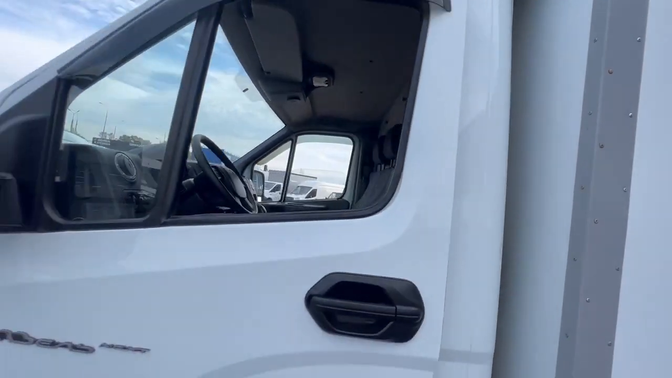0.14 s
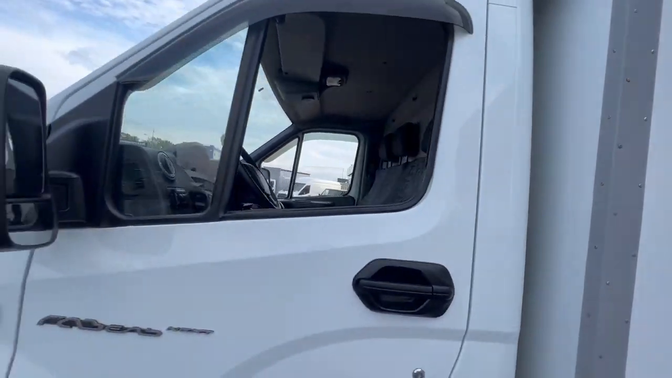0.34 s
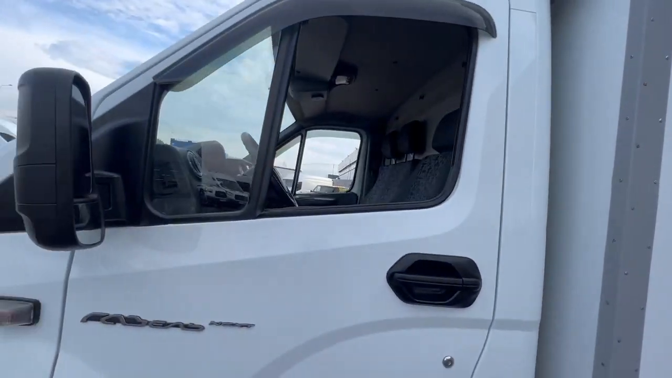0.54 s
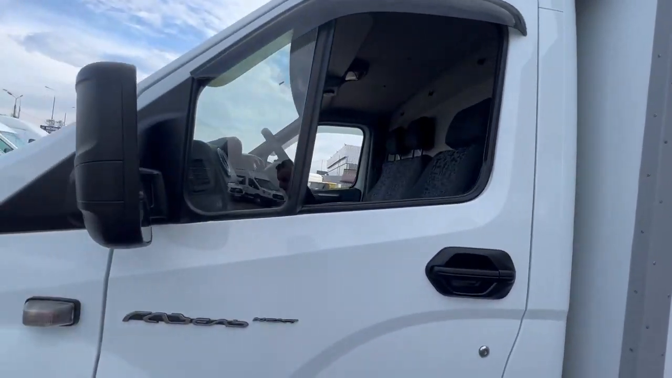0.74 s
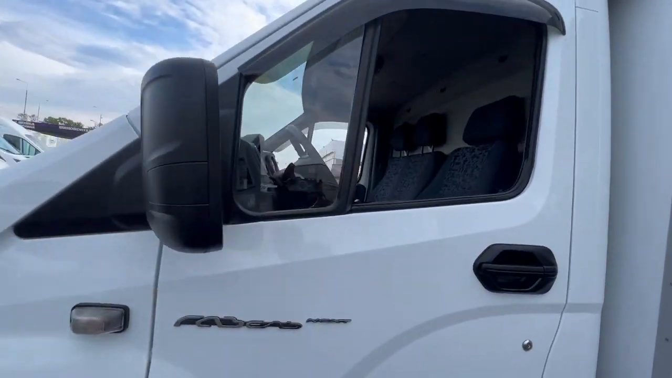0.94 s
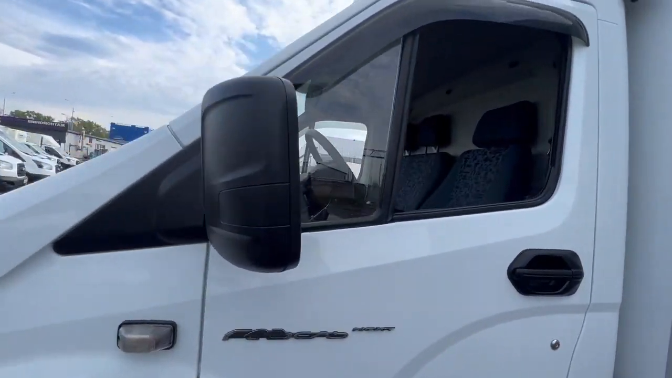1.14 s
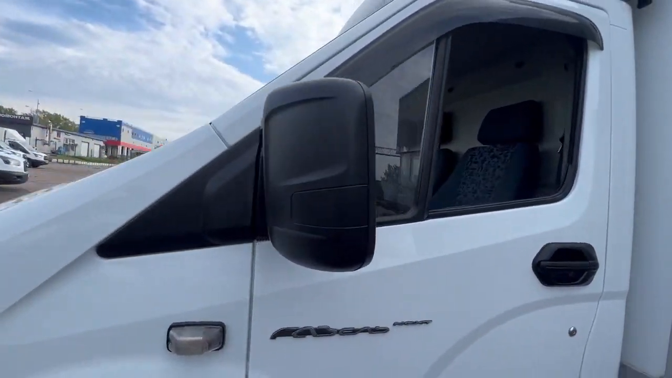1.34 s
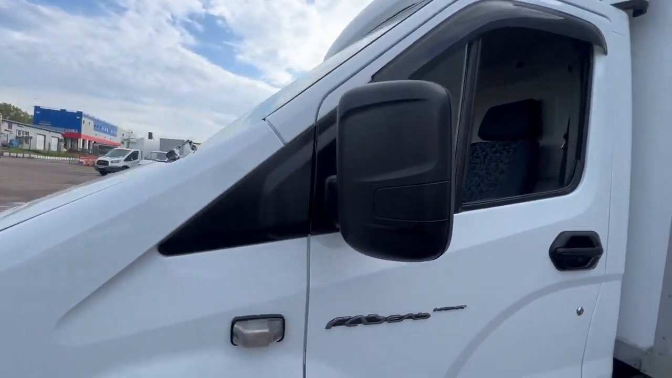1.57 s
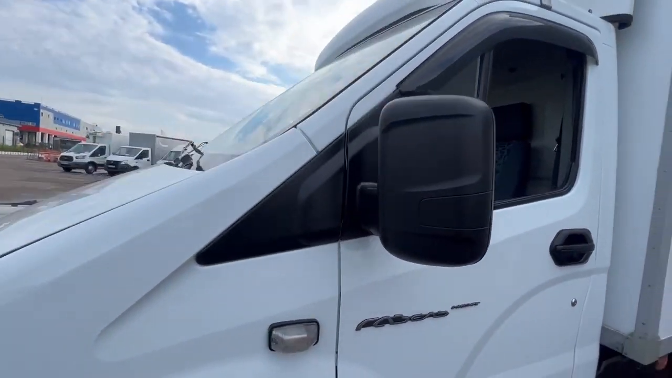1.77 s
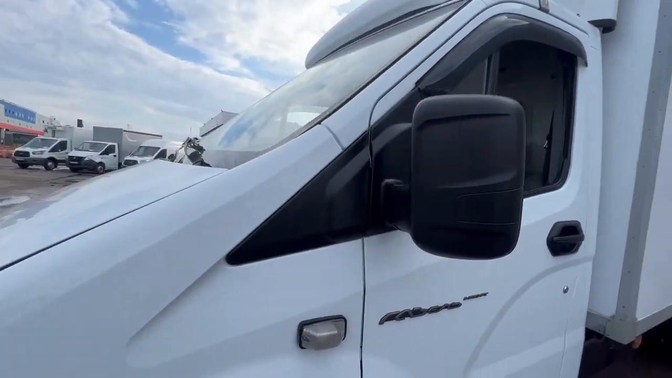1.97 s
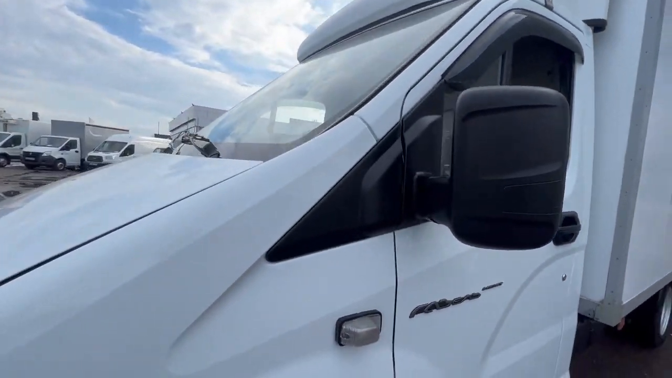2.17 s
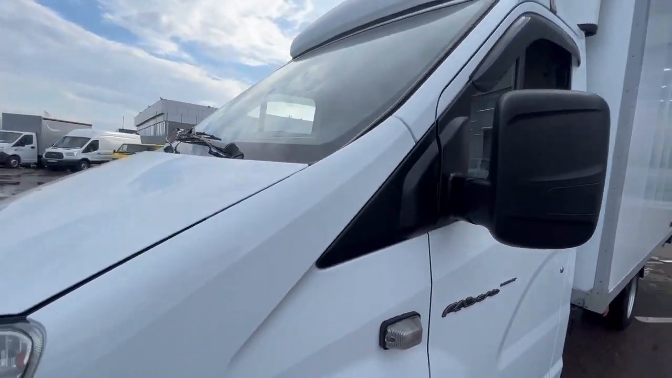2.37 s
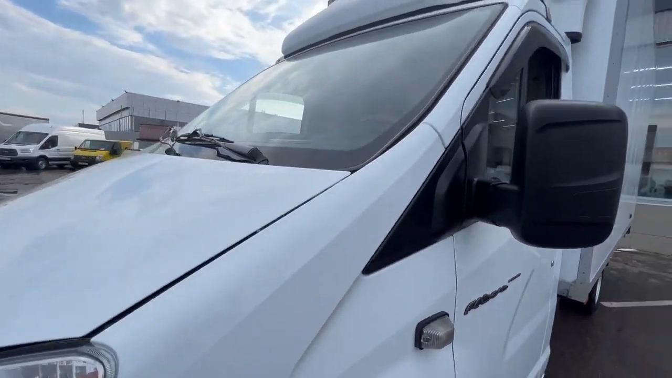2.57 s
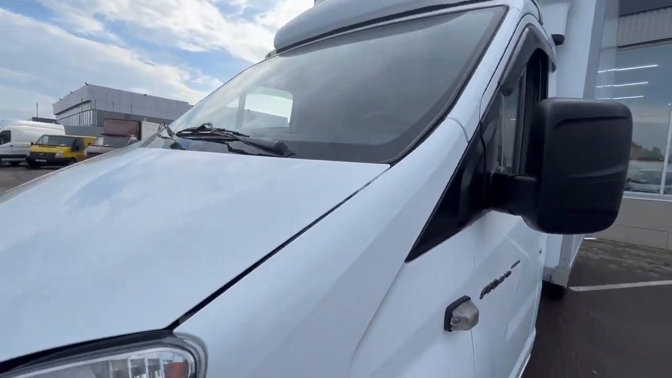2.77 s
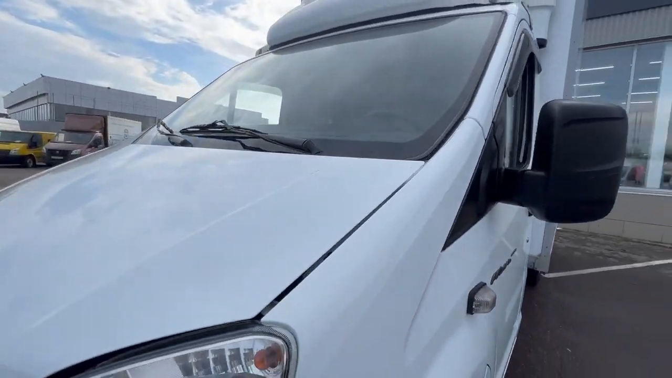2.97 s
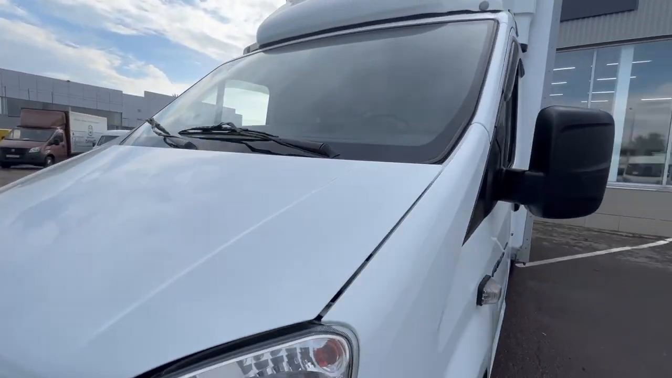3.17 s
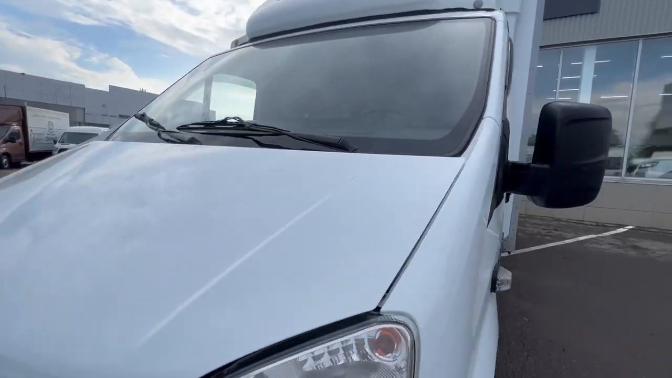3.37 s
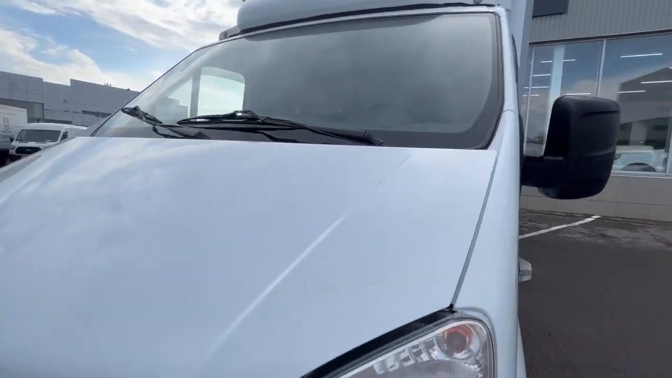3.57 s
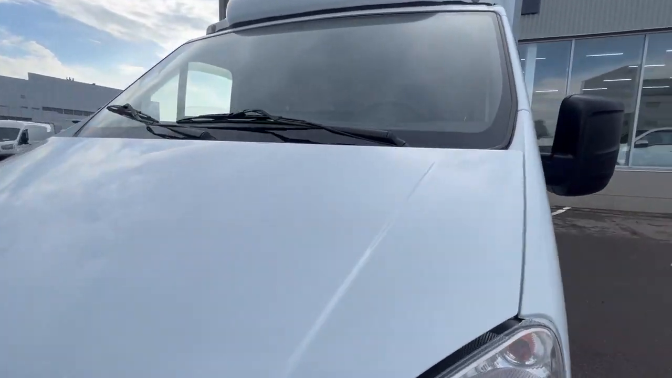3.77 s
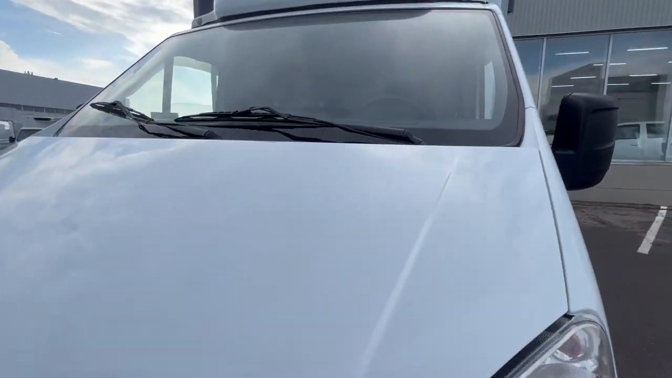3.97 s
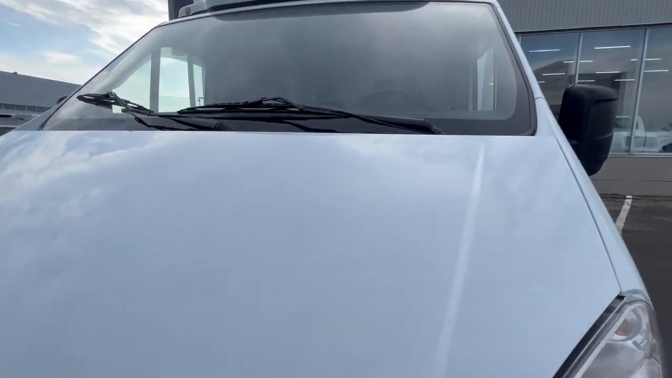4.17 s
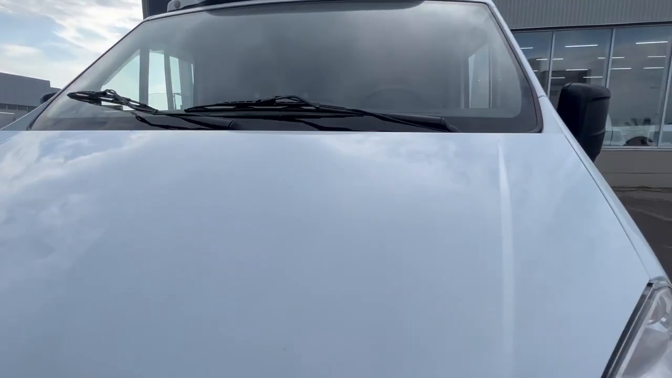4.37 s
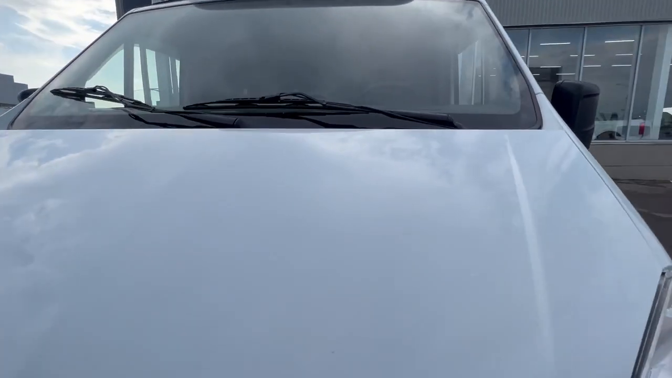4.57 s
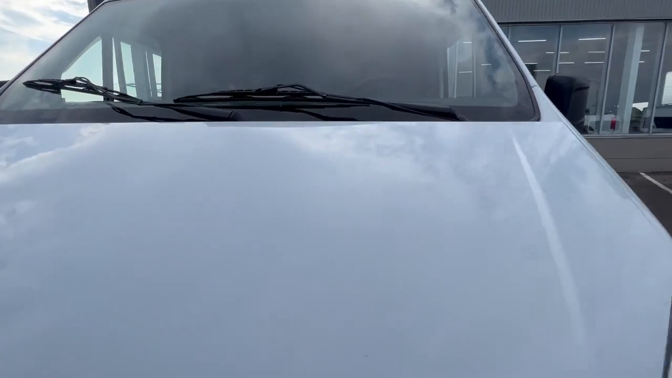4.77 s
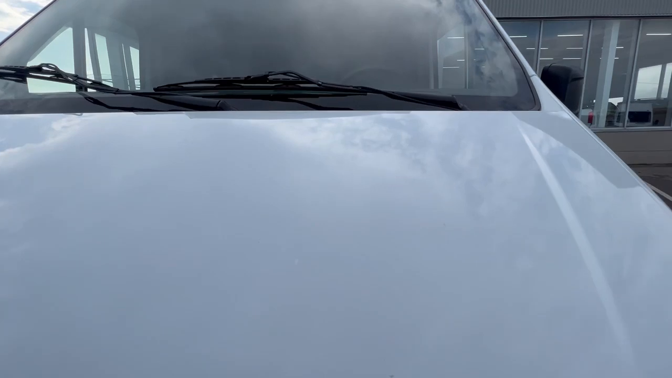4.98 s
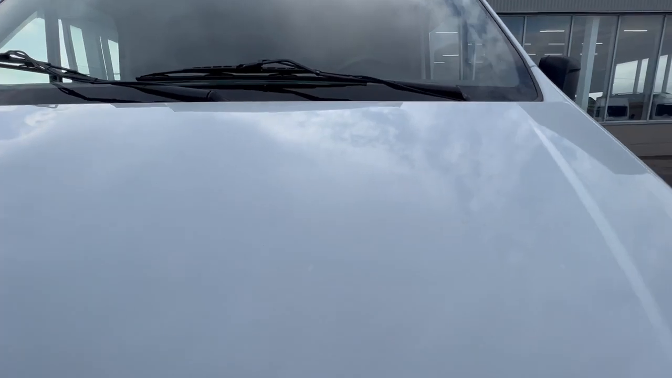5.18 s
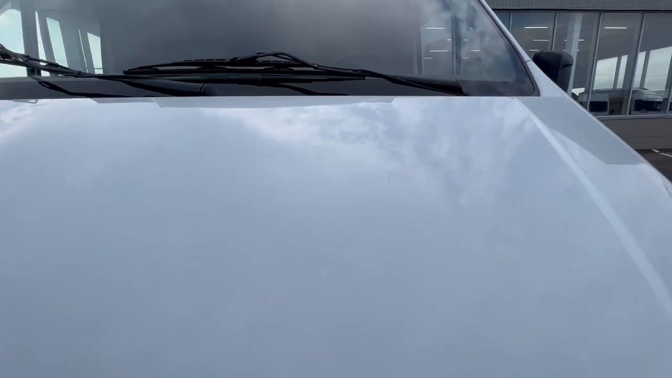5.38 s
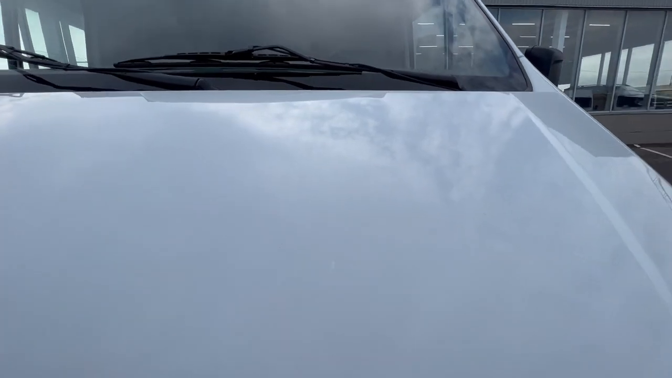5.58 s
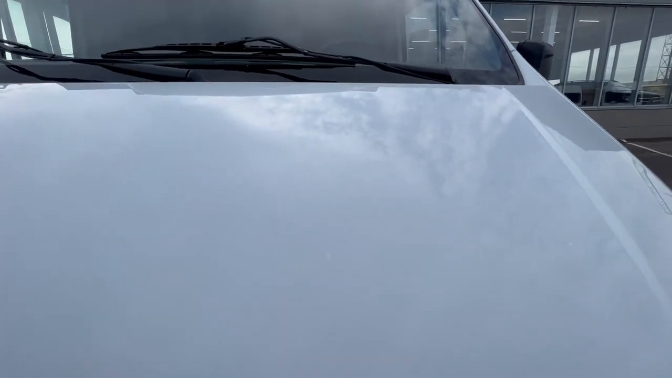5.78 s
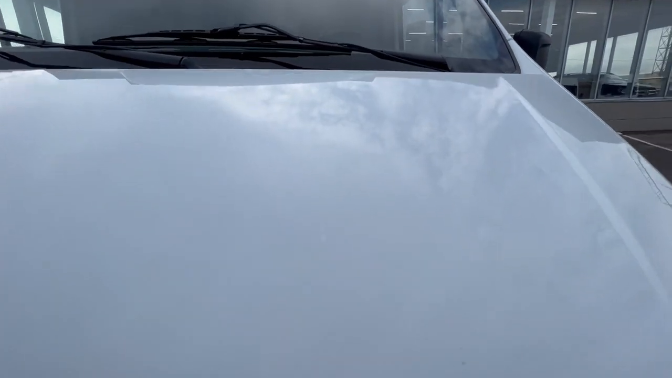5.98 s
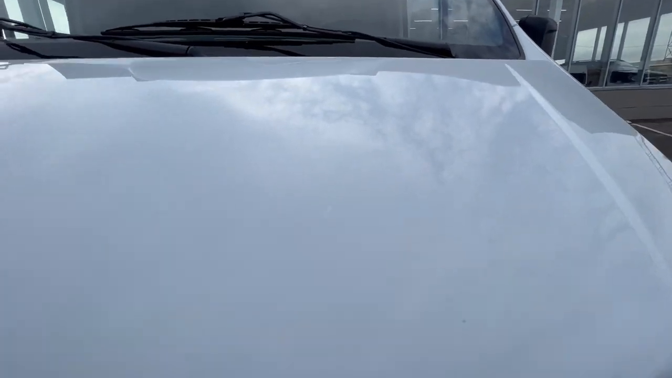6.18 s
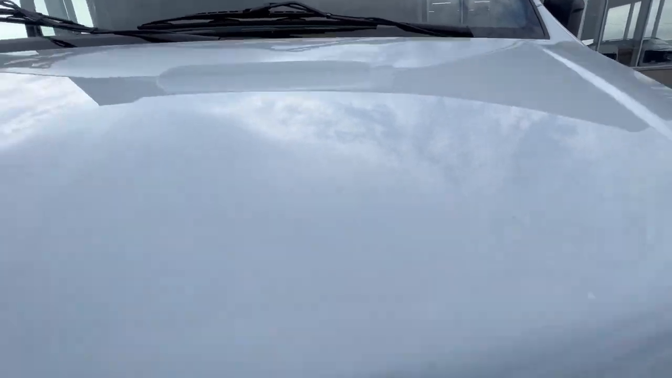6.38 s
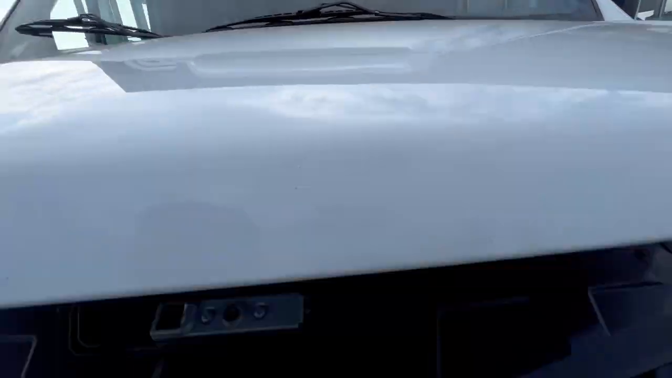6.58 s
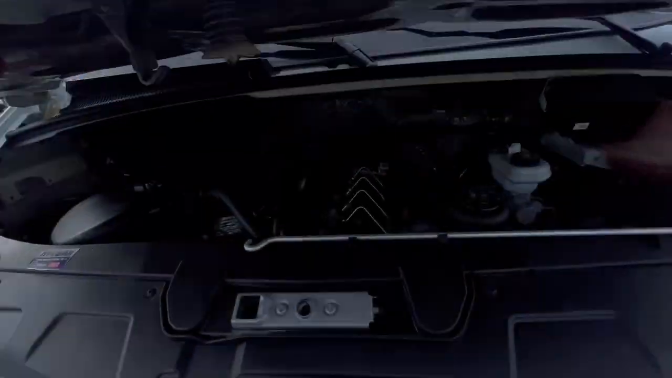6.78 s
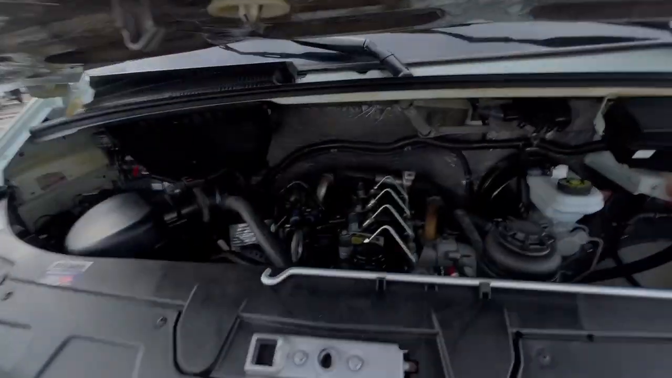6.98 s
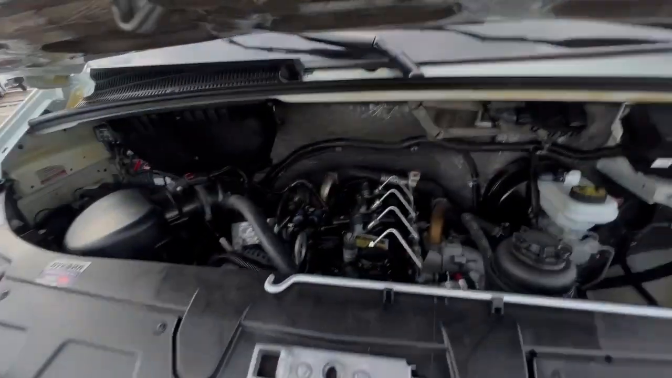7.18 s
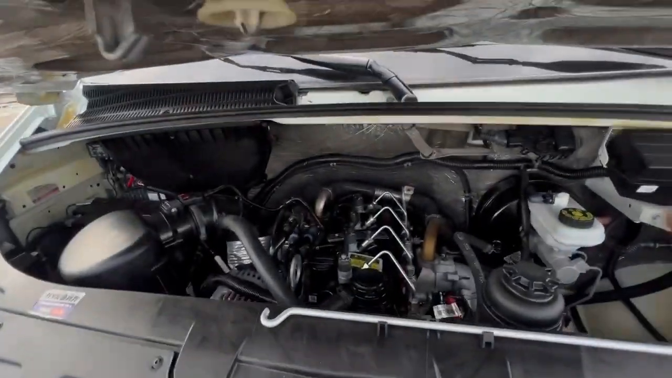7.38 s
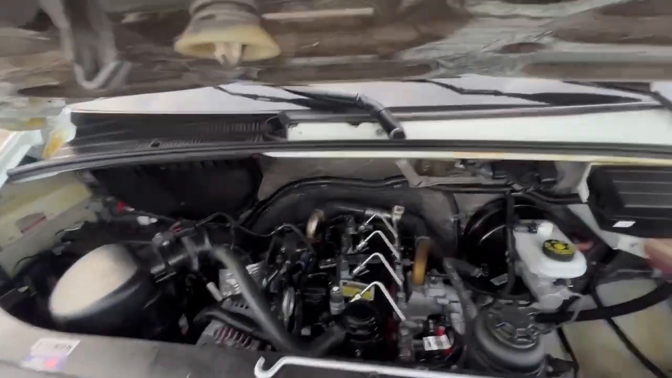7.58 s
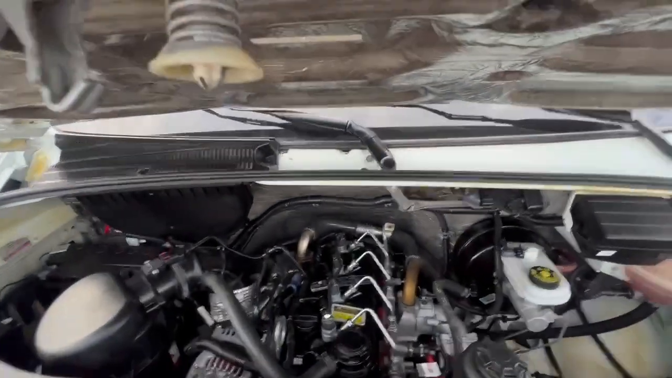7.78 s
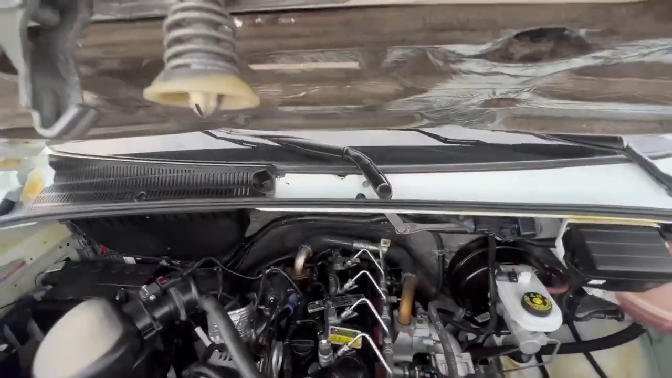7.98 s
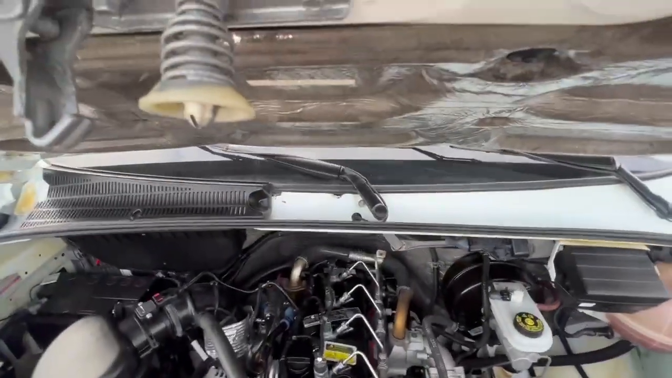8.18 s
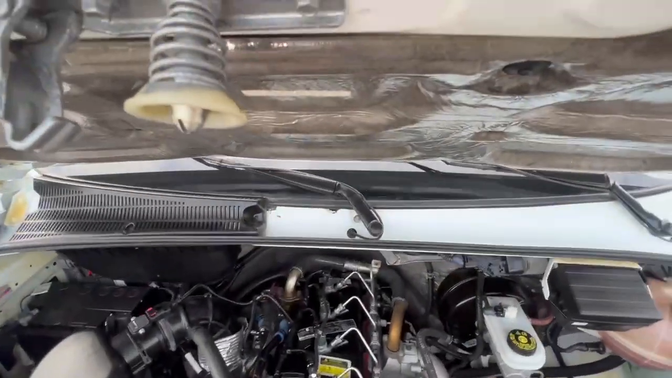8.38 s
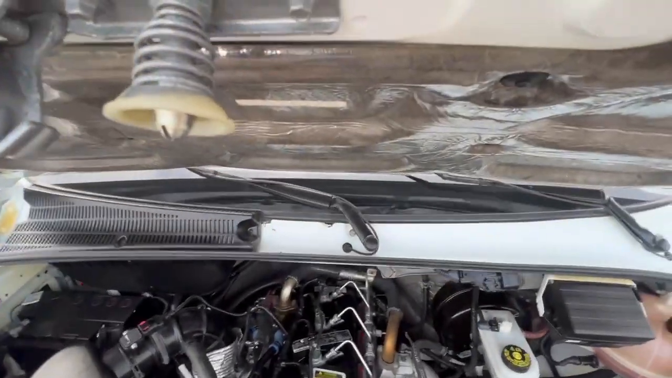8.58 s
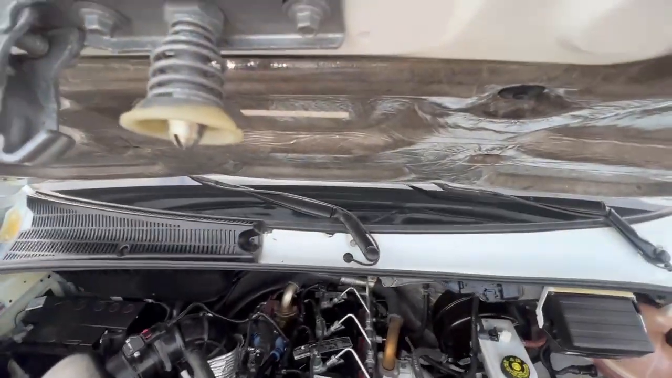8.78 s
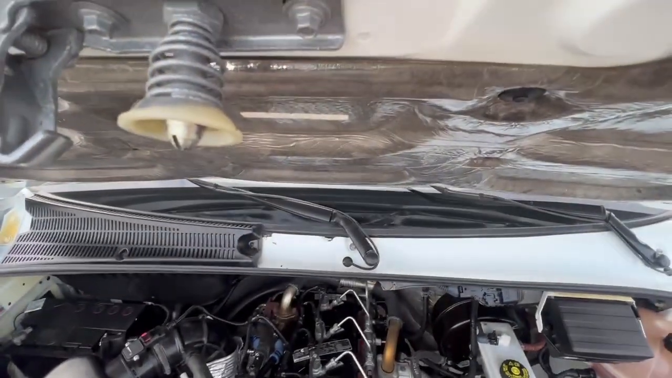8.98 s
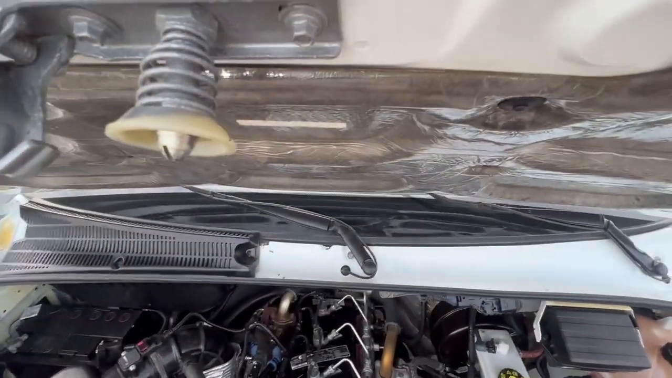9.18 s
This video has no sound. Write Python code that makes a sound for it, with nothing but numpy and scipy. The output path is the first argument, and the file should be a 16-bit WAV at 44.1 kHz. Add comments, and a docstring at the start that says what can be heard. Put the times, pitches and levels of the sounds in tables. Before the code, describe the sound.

A diesel van idles steadily in an open lot, about twenty-five firings a second, heard by a moving handheld stereo microphone. At 0.2 s the cab door slams: metallic latch, deep cab boom, ringing skin and short rattles until about 0.4 s. The engine is then muffled, a low shaking rumble with hum and a faint fluttering whine. From 2 to 4.5 s the microphone walks to the nose; knocking grows clearer, with soft low wind buffets around 2.2 s and between 3.6 and 4.2 s. Hands thump the bonnet lightly at 5.8 and 6.0 s. At 6.4 s the catch clanks and rebounds; by 6.8 s the bare engine is much louder, with hard clatter, bright injector ticking and fan rush. Another clank sounds at 7.0 s, while a high whine swells until 7.5 s. The engine eases slightly as the microphone rises; hinges rattle at 8.65 s, and idling continues to 9.2 s.

```python
"""Idling diesel van and its bonnet

A four-cylinder diesel van idles in an open lot. The cab door slams; the microphone walks from the door to the
nose through puffs of wind. The bonnet is unlatched and lifted, and the bare engine clatters close by.
Engine blows shape noise that rings in metal parts; hum and whine are sine tones that follow the engine's speed.
Door and bonnet are fading tones and short noises; the wind is low noise that comes in puffs."""
import sys
import numpy as np
from scipy import signal
from scipy.fft import rfft, irfft, next_fast_len
from scipy.io import wavfile
from scipy.ndimage import uniform_filter1d, map_coordinates

SR = 44100
rng = np.random.default_rng(int(sys.argv[2]) if len(sys.argv) > 2 else 0)


def int16_out(signal):
    """Quantize to a 16-bit WAV file."""
    q = np.round(np.clip(np.atleast_2d(signal).T, -1, 1) * 32767)
    wavfile.write(sys.argv[1], SR, q.astype(np.int16))


N = 407043  # length in samples

# the blows of every firing (pilot injection, main combustion, piston slap, a valve seating):
# place/firings, knock level/dB, cover level/dB, tick level/dB
BLOWS = [(-.19, -8.5, -21, 1.5), (-.06, -7, -3.5, 0.5), (0.108, -11, -9, -14.5), (0.458, -17.5, -10.5, -27)]
# the four cylinders differ a little: added knock level/dB, cover level/dB, tick level/dB
CYLINDER_LEVELS = [(6, 0.5, 7.5), (7, 5, 6), (5.5, 4.5, 9.5), (6, 4, 6)]
# how the knock carries: level/dB at the door, then the gain/dB at each place on the walk
KNOCK_CARRY = dict(door_db=-45, arch_db=.5, nose_db=9, open_db=10, raised_db=-3)
# colour of the clicks of door and bonnet: f/Hz, relative level/dB
CLICK_COLOUR = [(1500, -28), (2800, 2), (4500, -0.5), (6500, 8.5), (9500, -12), (12000, -15)]


def engine(firings, where):
    """Burning fuel shakes the block; the valve cover and the injectors add brighter clatter."""
    body = drone(firings, where) + knock(firings, where) + fan(where)
    return block(body, where) + cover(firings, where) + tick(firings, where)


def drone(firings, where):
    """The low shaking of the block: soft, overlapping blows, uneven in force and timing."""
    # colours at the door and the nose: f/Hz, left level/dB, right level/dB
    door_colour = [(5, -63, -63), (22, -5, 3), (49.7, -11, -5), (100, 8.5, 9), (145, -5, -13.5),
                   (258, -2, 5.5), (323, -23, -25), (398, -45, -23), (580, -13.5, -19), (1000, -62, -73)]
    nose_colour = [(5, -65, -62), (22, -7, -17), (50, -3, -8.5), (95, -11, -4), (145, -1, -1),
                   (234, -5.5, -0.5), (293, -5, 0), (413, -19, -4.5), (620, -16.5, -13.5), (1000, -76, -79)]
    # level/dB at the door, then the gain/dB at each place on the walk
    carry = dict(door_db=-36.5, arch_db=1, nose_db=2.5, close_db=6, open_db=1, raised_db=-4)
    _, nose, *_ = where
    x = shaking(firings, repeat=0.36, alike=0.8)
    x *= clatter(firings, blow_levels(1), lead=0, rise=0.0062, t60=0.09,
                 scatter_db=4.0, jitter=0.0027, between_db=6.0)
    x = blend(x, [(1 - nose, door_colour, 0), (nose, nose_colour, .7)])
    return amp(heard(where, **carry)) * x


def knock(firings, where):
    """Combustion knock: short blows, less smeared at the nose and with the bonnet open."""
    # colours at the door, the nose and the open bay: f/Hz, left level/dB, right level/dB
    door_colour = [(350, -61, -72), (610, -14, -4), (693, 3.5, 6), (1000, 5, 6), (1200, -9, 8.5),
                   (1330, 10, -7.5), (1450, -28, 1), (1620, -24, 8), (1766, 10, -6), (1994, -3, 12.5),
                   (2440, -68, -75)]
    nose_colour = [(350, -65, -84), (624, -17, -5), (770, -2.5, 0), (960, -10.5, -18), (1140, -4, -5.5),
                   (1450, -4.5, 1), (1560, 0.5, 0), (1805, -17.5, -3), (2100, 3.5, 3.5), (2500, -76, -66)]
    open_colour = [(352, -66, -64), (567, -46, -32), (782, -7.5, -3.5), (990, -5.5, -7), (1320, -10, -5.5),
                   (1500, -28, -2), (1612, -5, -1), (1806, -26, -2.5), (2020, -36, -12), (2500, -69, -76)]
    _, nose, _, bare, _ = where
    shut = 1 - bare
    x = shaking(firings, repeat=0.52, alike=0.53)
    x *= clatter(firings, blow_levels(1), lead=0.0032, rise=0.0012, t60=.033,
                 scatter_db=1.3, jitter=.00015, between_db=-14 + 3 * shut + 11 * (1 - nose))
    x = flicker(x, depth_db=1.6)
    x = blend(x, [(1 - nose, door_colour, .8), (nose * shut, nose_colour, .75), (nose * bare, open_colour, .82)])
    return amp(heard(where, **KNOCK_CARRY)) * x


def cover(firings, where):
    """The valve cover rings under the blows; the shut bonnet smears them."""
    # colours with the bonnet shut and open: f/Hz, left level/dB, right level/dB
    shut_colour = [(1800, -50, -62), (2080, 5, 7), (2296, -4, 10.5), (2560, 7, -19), (3400, -40, -52)]
    open_colour = [(1710, -49, -29), (1960, 1.5, 7.5), (2345, -6, 8), (2590, -26, -11), (3330, -67, -67)]
    # resonances: f/Hz, width/Hz, then level/dB above the broad sound: bonnet shut, in the open bay, above it
    cover_modes = [(2096, 34, 1.5, 14.3, -5), (2166, 81, 9.5, 14, 11), (2252, 22, 9.5, 4.4, -5),
                   (2330, 54, 10, 3.1, 7)]
    # level/dB at the door, then the gain/dB at each place on the walk
    carry = dict(door_db=-42, arch_db=7, nose_db=1, close_db=1, open_db=19.5, raised_db=-8.5)
    *_, bare, raised = where
    shut = 1 - bare
    x = shaking(firings, repeat=0.25, alike=0.73)
    x *= clatter(firings, blow_levels(2), lead=0.0041, rise=.0011, t60=.04,
                 scatter_db=1.3, jitter=.0005, between_db=-16 + 8.5 * shut)
    x = shifting(x, cover_modes, (shut, bare * (1 - raised), bare * raised))
    x = blend(x, [(shut, shut_colour, .42), (bare, open_colour, .83)])
    return amp(heard(where, **carry)) * x


def tick(firings, where):
    """The injectors tick and ring high up; the shut bonnet smears the blows."""
    # colours with the bonnet shut and open: f/Hz, left level/dB, right level/dB
    shut_colour = [(2000, -56, -79), (2450, -5.5, 2.5), (3170, -1.5, -2.5), (4450, -8.5, -12.5),
                   (5200, -6, -4.5), (6200, -2.5, 0), (9590, -19, -16), (10400, -39, -36),
                   (13000, -77, -70)]
    open_colour = [(2010, -56, -62), (2690, 2.5, 0.5), (3100, 1, 1), (4300, -3.5, -5.5), (5240, -1.5, -4),
                   (6540, 2, 5.5), (9490, -15, -4.5), (10860, -7.5, -22), (11400, -11, -3),
                   (12700, -72, -75)]
    # resonances: f/Hz, width/Hz, level/dB above the broad sound
    injector_modes = [(2995, 45, 4.5), (3415, 60, 5), (4140, 34, 5), (4715, 50, 4.5), (6600, 390, 2),
                      (9420, 210, 2.8)]
    # level/dB at the door, then the gain/dB at each place on the walk
    carry = dict(door_db=-49.5, nose_db=5, open_db=18, raised_db=-4.5)
    _, nose, _, bare, _ = where
    shut = 1 - bare
    x = shaking(firings, repeat=0.45, alike=0.29)
    x *= clatter(firings, blow_levels(3), lead=0.0059, rise=0.0021, t60=0.072,
                 scatter_db=2.0, jitter=0.0012, between_db=-2 + 6.34 * shut + 1.3 * (3 - nose))
    x = resonate(x, injector_modes)
    behind_sheet = blend(x, [(shut, shut_colour, -.27)])
    in_the_open = blend(flicker(x, depth_db=2.6), [(bare, open_colour, .16)])
    return amp(heard(where, **carry)) * (behind_sheet + in_the_open)


def block(x, where):
    """The engine block's resonances, heard differently at each place on the walk."""
    # f/Hz, width/Hz, then level/dB above the broad sound: door, nose, bonnet's edge, open bay, above it
    block_modes = [(374.3, 13.3, 7, -4, 3.7, 5.6, 6.5), (524.7, 20, 12.5, -4, 1, 2, 5),
                   (745, 23, 3, 4, 3, 4.2, 9.5), (930, 26, -6, 9, 2.1, 4, 4),
                   (1041.6, 21, -4, 6, 1.3, 8.2, 6), (1125, 22, -1, 7, 2, 3, 8),
                   (1320, 38, 0.5, 7.5, 6, 9.4, 4), (1407, 17, -14, 13, 2.5, 2, 2.5),
                   (1686, 53, -2, 4.5, 7.7, 9, -2.5), (1717, 62, -5, 9, 7, 6.4, 11.5),
                   (1880, 46, 4.5, 9, 5.4, 11, 3.5)]
    _, nose, close, bare, raised = where
    edge = nose * close
    shares = (1 - nose, nose * (1 - close), edge * (1 - bare), edge * bare * (1 - raised), edge * bare * raised)
    return shifting(x, block_modes, shares)


def fan(where):
    """The radiator fan rushes steadily between the knocks and carries like them."""
    # f/Hz, relative level/dB
    fan_colour = [(200, -42), (420, -3.5), (520, -9), (600, 2), (760, -1), (1020, 4), (1230, -10.5),
                  (1450, -10), (1900, -6), (2600, -60)]
    _, nose, *_ = where
    rush = pair(rng.standard_normal(N), alike=0.58)
    rush = blend(rush, [(1 - nose, fan_colour, .8), (nose, fan_colour, .82)])
    level_db = heard(where, **KNOCK_CARRY) - 6 + 0.29 * wobble(1.7)
    return amp(level_db) * rush * amp([[-1.5], [1.2]])


def hum(firings, where):
    """Pipe and body hum: tones at multiples of the firing rate, each swaying a little in strength."""
    orders = (2, 3, 4, 7.5)
    # for each order: level/dB at the door, then the gain/dB at each place on the walk
    carries = [dict(door_db=-35.5, close_db=5.5, open_db=2, raised_db=-6),
               dict(door_db=-35.5, close_db=-1, open_db=7, raised_db=-9.5),
               dict(door_db=-44, close_db=4.5, open_db=5, raised_db=-12),
               dict(door_db=-71, nose_db=34, open_db=6, raised_db=-10)]
    dip_db = -13 * (ramp(3.8, 2.8) - ramp(4.56, 5.03))  # the two lowest tones dip briefly
    total = 0
    for order, carry, change_db in zip(orders, carries, (dip_db, dip_db, 0, 0)):
        level_db = heard(where, **carry) + change_db + 0.79 * wobble(8.4)
        phase = 2 * np.pi * (order * firings + rng.random()) + 0.2 * wobble(11.0)
        total = total + np.sqrt(2) * amp(level_db) * np.sin(phase)
    return total


def whine(firings):
    """Two close tones geared to the crank, fluttering with the belt."""
    # the whine swells and fades as the microphone moves through its standing waves: t/s, relative level/dB
    whine_levels = [(0, -59), (1.4, -53), (1.7, -37.5), (2.0, -47), (2.4, -40), (2.7, -39), (2.95, -44),
                    (3.2, -34), (3.5, -51), (6.4, -43), (6.95, -30), (7.5, -28), (8.0, -63), (9.23, -60)]
    level_db, = curves(whine_levels)
    flutter = .6 * wobble(12)  # shared phase wander, radians
    total = 0
    for order, tone_db in ((88.35, -4), (89.35, 0)):  # cycles per firing, dB
        strength = amp(level_db + tone_db + 1.8 * wobble(14))
        total = total + strength * np.sin(2 * np.pi * order * firings + flutter + 0.27 * wobble(13))
    return np.sqrt(2) * total * amp([[-5], [3]])


def door():
    """The latch catches and rings, the cab air booms, the skin rings at each rebound, the frame hums on."""
    # latch, slam and rattles: t/s, then relative level/dB of boom, skin, frame, panel, latch, click
    door_blows = [(.175, -53, -45, -57, -22, -12, -55), (.188, -41, -27, -45, -15, -4, -25),
                  (.199, -23, -24, -35, -13, -9, -19), (.208, -7, -22, -21, -15, -30, -25),
                  (.224, -22, -19, -40, -12.5, -28, -25), (.243, -24, -7, -37, -12.5, -21, -23.5),
                  (.272, -9.5, -23, -30, -16.5, -17, -25.5), (.281, -27, -23, -35, -16.5, -21, -31),
                  (.313, -23, -14, -17, -17.5, -18, -26.5), (.335, -22, -20, -13, -23, -38, -53)]
    # ringing of the cab's air, the skin, the frame and the latch: f/Hz, relative level/dB, t60/s
    cab_modes = [(53.6, -4.5, 0.17), (71.5, -0.5, 0.15)]
    skin_modes = [(135.6, -2, 0.26), (161.6, -2.5, 0.19), (201, -9.5, 0.28), (253.3, -10.5, 0.27),
                  (330, -12.5, 0.24), (387, -15, 0.21), (506, -16, 0.14), (642, -21, 0.15)]
    frame_modes = [(103.3, 0, 0.48)]
    latch_modes = [(661, -3.5, 0.1), (828, -10.5, .08), (964, -6, .1), (1054, -2, 0.13), (1340, -4, 0.052),
                   (1575, -7, .06), (1767, -3, 0.055)]
    # colour of the panel's noise: f/Hz, relative level/dB
    panel_colour = [(70, -33), (150, -4.5), (250, -4), (360, -9), (480, -9.5), (600, -10.5), (850, -8.5),
                    (1400, -20), (2400, -21), (5000, -47)]
    # the boom carries little below about 40 Hz: f/Hz, gain/dB
    boom_cut = [(15, -32), (32, -10), (44, 12), (55, 0)]
    times, boom_db, skin_db, frame_db, panel_db, latch_db, click_db = np.transpose(door_blows)
    boom = ring(times, boom_db, cab_modes, rise=0.0044, spread=.17)
    skin = ring(times, skin_db, skin_modes, rise=0.0033, spread=.3)
    frame = ring(times, frame_db, frame_modes, rise=0.0059, spread=.15)
    panel = strikes(times, amp(panel_db - 1), rise=.0004, t60=.09) * hiss(panel_colour, alike=.15)
    latch = ring(times, latch_db - 4, latch_modes, rise=0.00047, spread=0.69)
    click = strikes(times, amp(click_db), rise=0.0002, t60=0.11) * hiss(CLICK_COLOUR, alike=0.11)
    low = colour(boom + skin + frame, boom_cut) * amp([[-1], [1]])
    return low + (panel + latch + click) * amp([[-4], [2.5]])


def bonnet():
    """Hands knock the sheet metal; the steel catch clanks as it lets go; the hinges rattle late, bonnet up."""
    # hands on the bonnet, its catch and its prop: t/s, relative panel level/dB, click level/dB
    bonnet_blows = [(2.409, -34, -58), (5.789, -21, -41), (6.02, -17, -61), (6.388, -12, -24.5),
                    (6.402, -10.5, -38), (6.436, -18.5, -37), (6.474, -16, -35.5), (7.03, -16.5, -27),
                    (8.634, -13, -40), (8.653, -13, -47), (8.676, -34, -52)]
    # the steel catch springs open and rebounds; a last clank, perhaps the prop, comes with the bonnet up:
    # t/s, relative level/dB
    catch_blows = [(6.389, -13), (6.396, -17), (6.436, -24), (6.474, -33), (7.032, -10)]
    # the hinges rattle late, with the bonnet already up: t/s, relative level/dB
    hinge_blows = [(8.633, -18), (8.653, -19), (8.675, -25), (8.703, -24), (8.727, -30)]
    # ringing of the sheet, the catch and the hinges: f/Hz, relative level/dB, t60/s
    sheet_modes = [(184, -22, 0.34), (275.6, -6.5, 0.28), (382, -12.5, .25), (506, -9.5, .18),
                   (806, -16, .12), (1266, -17, .1), (1650, -26, .08)]
    catch_modes = [(1070, -8, 0.076), (1186, -7, .07), (1262, -5, .09), (1390, -7, 0.08), (1595, -1, 0.066),
                   (2080, -5, .1), (2235, -7, 0.16)]
    hinge_modes = [(261, -13, 0.19), (362, -5, 0.19), (702, -5.5, 0.069), (823, 3.5, .06),
                   (980, 5.5, 0.051), (1076, -1, .06)]
    # colour of the panel's noise: f/Hz, relative level/dB
    panel_colour = [(100, -39), (180, -9), (270, -8), (500, 1), (750, -12), (1150, -3), (1700, -17),
                    (2200, -15.5), (2600, -22), (6000, -53)]
    times, panel_db, click_db = np.transpose(bonnet_blows)
    panel = strikes(times, amp(panel_db - 10), rise=.0003, t60=.11) * hiss(panel_colour, alike=.22)
    sheet = ring(times, panel_db - 3.5, sheet_modes, rise=.0008, spread=0.37)
    click = strikes(times, amp(click_db), rise=0.00015, t60=0.1) * hiss(CLICK_COLOUR, alike=0.53)
    catch = ring(*np.transpose(catch_blows), catch_modes, rise=0.00074, spread=0.99)
    hinge = ring(*np.transpose(hinge_blows), hinge_modes, rise=.0005, spread=.5)
    return (panel + sheet + click + catch + hinge) * amp([[-3], [2.5]])


def wind():
    """Lumpy low buffeting on the microphone: each puff swells and then dies away a little faster."""
    # time of the peak t/s, relative level/dB
    puffs = [(2.16, -25), (3.63, -24.5), (3.71, -21), (3.859, -25.5), (3.93, -19.5), (4.042, -21),
             (4.182, -20.5)]
    # buffeting colour: f/Hz, relative level/dB
    buffet_colour = [(20, -35), (45, -8), (75, 2), (110, -7.5), (200, -10), (400, -26.5), (900, -37.5),
                     (3000, -100)]
    rise_s, fall_s = 0.063, 0.045  # time constants of a puff
    t = np.arange(N) / SR
    power = 0
    for peak, db in puffs:
        swell = np.exp(-np.maximum((peak - t) / rise_s, (t - peak) / fall_s))
        power = power + (amp(db) * swell) ** 2
    lumps = amp(1.25 * wobble(30))
    return np.sqrt(power) * lumps * hiss(buffet_colour, alike=0.31) * amp([[3.5], [-3]])


def places():
    """How far the microphone is at each place, 0-1: wheel arch, nose, bonnet's edge, open bay, raised."""
    # t/s, share of the way from door to nose (0-1), bonnet opening (0-1)
    walk = [(0, 0.32, 0.13), (3.2, 0.5, 0.04), (4.4, 1, 0), (6.35, 1, 0.12), (6.8, 0.99, 1), (9.23, 1, 1)]
    nose, bare = np.clip(curves(walk), 0, 1)
    arch = ramp(1.8, 3.2) - ramp(2.4, 3.3)  # past the open wheel arch
    close = ramp(4.16, 5.8)  # up to the bonnet's edge
    raised = ramp(6.34, 8.56)  # up and away from the bare engine
    return arch, nose, close, bare, raised


def heard(where, door_db, arch_db=0, nose_db=0, close_db=0, open_db=0, raised_db=0):
    """Level in dB of one part of the engine along the walk."""
    arch, nose, close, bare, raised = where
    return (door_db + arch_db * arch + nose_db * nose + close_db * close
            + open_db * bare + raised_db * raised)


def blow_levels(column):
    """Level in dB of each blow (across) of each cylinder (down): 1 knock, 2 cover, 3 tick."""
    return np.transpose(CYLINDER_LEVELS)[column - 1][:, None] + np.transpose(BLOWS)[column]


def clatter(firings, blows_db, lead, rise, t60, scatter_db, jitter, between_db):
    """The blows of each cylinder in turn, with uneven force and timing over a steady churn; times in s."""
    number = np.arange(int(firings[-1]) + 2)
    cylinder = number % len(CYLINDER_LEVELS)
    counts = number[:, None] + np.transpose(BLOWS)[0]
    outside = 2 * N / SR  # blows outside the scene are put past its end
    times = np.interp(counts, firings, np.arange(N) / SR, left=outside, right=outside)
    times = times - lead + jitter * rng.standard_normal(counts.shape)
    sizes = amp(blows_db[cylinder] + scatter_db * rng.standard_normal(counts.shape))
    return np.hypot(strikes(times.ravel(), sizes.ravel(), rise, t60), amp(between_db))


def shaking(firings, repeat, alike):
    """Broadband vibration, a share of which comes back the same in every engine cycle."""
    repeat = np.clip(repeat, 0, 1)
    count = int(4 * N / (firings[-1] - firings[0]))  # samples in a cycle of four firings
    place = (firings / 4 % 1 * count).astype(int) % count
    cycle = rng.standard_normal(count)[place]
    return pair(np.sqrt(repeat) * cycle + np.sqrt(1 - repeat) * rng.standard_normal(N), alike)


def strikes(times, sizes, rise, t60):
    """Envelope of blows whose energies swell, add up and die away."""
    t = np.arange(SR // 2) / SR
    shape = (1 - np.exp(-t / rise)) * amp(-60 * t / t60)
    energy = (shape / shape.max()) ** 2
    train = np.bincount(np.clip(times * SR, 0, N).astype(int), sizes ** 2, N + 1)[:N]
    return np.sqrt(np.abs(signal.fftconvolve(train, energy)[:N]))


def ring(times, levels_db, modes, rise, spread):
    """Every blow rings the modes anew, with uneven force and a phase difference between the channels."""
    out, t = np.zeros((2, N + SR)), np.arange(SR // 2) / SR
    sides = np.array([[1], [-1]])
    for s, db in zip(times, levels_db):
        for (hz, level, t60), (force, angle) in zip(modes, rng.standard_normal((len(modes), 2))):
            fade_db = db + level + 1.5 * force - 60 * t / t60
            envelope = amp(fade_db) * (1 - np.exp(-t / rise))
            wave = np.sin(2 * np.pi * hz * t + spread * angle * sides)
            out[:, round(s * SR):][:, :len(t)] += envelope * wave
    return out[:, :N]


def resonate(x, modes):
    """x plus its ringing in narrow (f/Hz, width/Hz, level/dB) resonances."""
    size = next_fast_len(N + SR // 2, True)
    f = np.fft.rfftfreq(size, 1 / SR)
    response = 1
    for hz, width, db in modes:
        response = response + (amp(db) - 1) * 1j * f * width / (hz * hz - f * f + 1j * f * width)
    return irfft(rfft(x, size) * response, size)[:, :N]


def shifting(x, table, shares):
    """Resonances come and go along the walk: one dB column and one share for each place."""
    hz, width, *levels = np.transpose(table)
    return sum(share * resonate(x, zip(hz, width, db)) for share, db in zip(shares, levels))


def flicker(x, depth_db):
    """No two blows have quite the same colour: gain varies in small patches of time and frequency."""
    z = signal.stft(x, nperseg=512)[2]
    field = uniform_filter1d(rng.standard_normal(z.shape[1:]), size=6, axis=0)
    field = uniform_filter1d(field, size=7, axis=1)
    return signal.istft(z * amp(depth_db * field / field.std()), nperseg=512)[1][:, :N]


def blend(x, views):
    """Cross-fade of x through the (share, colour, lag in ms) of each listening place."""
    return sum(share * unit(colour(x, points, lag)) for share, points, lag in views)


def hiss(points, alike):
    """Coloured stereo noise; the mean of its channels has rms 1."""
    return unit(colour(pair(rng.standard_normal(N), alike), points))


def colour(x, points, lag_ms=0):
    """x shaped by (f/Hz, level/dB, ..) points; the left channel is shifted lag_ms later."""
    size = next_fast_len(N + 8192, True)
    hz = np.fft.rfftfreq(size, 1 / SR)
    f, *cols = np.transpose(points)
    gain = amp([np.interp(np.log(hz + 1), np.log(f), c) for c in cols])
    y = irfft(rfft(x, size) * gain, size)[:, :N]
    return np.array([np.roll(y[0], round(lag_ms * SR / 1000)), y[1]])


def pair(shared, alike):
    """Two channels: a shared wave plus scattered sound of their own."""
    alike = np.clip(alike, 0, 1)
    return np.sqrt(alike) * shared + np.sqrt(1 - alike) * rng.standard_normal((2, N))


def ramp(start, end):
    """Rises from 0 to 1 between two times in s; with the end first, it jumps just after the start."""
    return np.clip((np.arange(N) / SR - start) / max(end - start, 1 / SR), 0, 1)


def curves(rows):
    """One value per sample for each column after the time."""
    s, *cols = np.transpose(rows)
    return [np.interp(np.arange(N) / SR, s, c) for c in cols]


def wobble(rate):
    """A smooth random curve, rate knots a second."""
    knots = rng.standard_normal(int(N * rate / SR) + 4)
    return map_coordinates(knots, [np.arange(N) * rate / SR])


def unit(x):
    """Scaled so that the mean of the channels has rms 1."""
    return x / np.sqrt(np.mean(np.atleast_2d(x).mean(0) ** 2) + 1e-20)


def amp(db):
    """Turns dB into a plain amplitude factor."""
    return 10 ** (np.asarray(db) / 20)


def scene():
    """The idling engine along the walk, with the door, the bonnet and the wind."""
    # idle speed, about 25 firings a second: t/s, count/firings
    crank = [(0.0, 0.16), (0.8, 20.32), (1.7, 42.86), (2.5, 63.03), (4.2, 105.86), (5.8, 145.97),
             (7.5, 188.61), (9.23, 232.0)]
    firings, = curves(crank)
    where = places()
    return engine(firings, where) + hum(firings, where) + whine(firings) + door() + bonnet() + wind()


def record(dry):
    """Dips in the treble, peaks rounded off just under full scale, nothing above the band limit."""
    # f/Hz, gain/dB
    treble_dips = [(5100, -0.5), (5300, -29), (5450, -10), (5650, -8), (7350, -5.5), (7550, -24),
                   (7850, -11.5), (8100, -2), (10200, 5), (10600, -9)]
    ceiling, hardness = .96, 6  # full scale is 1; a higher hardness bends later
    top_hz = 11800
    x = colour(dry, treble_dips)
    held = x / (1 + np.abs(x / ceiling) ** hardness) ** (1 / hardness)
    return irfft(rfft(held) * (np.fft.rfftfreq(N, 1 / SR) < top_hz), N)


dry = scene()
out = record(dry)
int16_out(out)
```